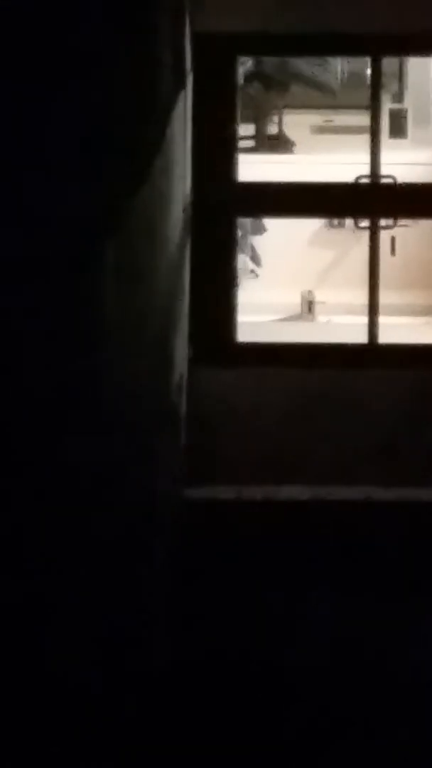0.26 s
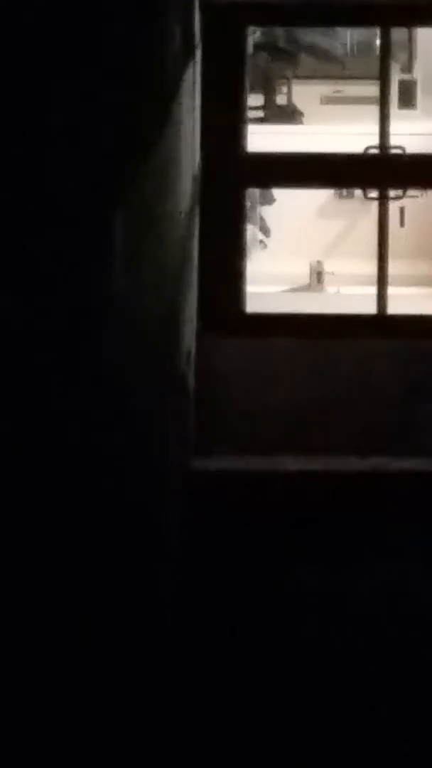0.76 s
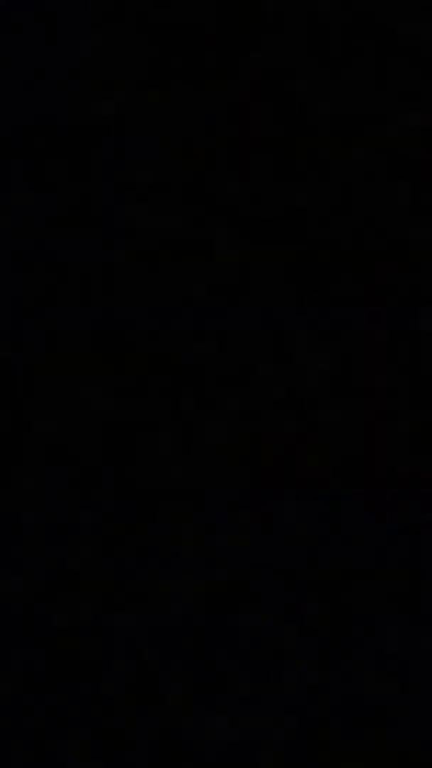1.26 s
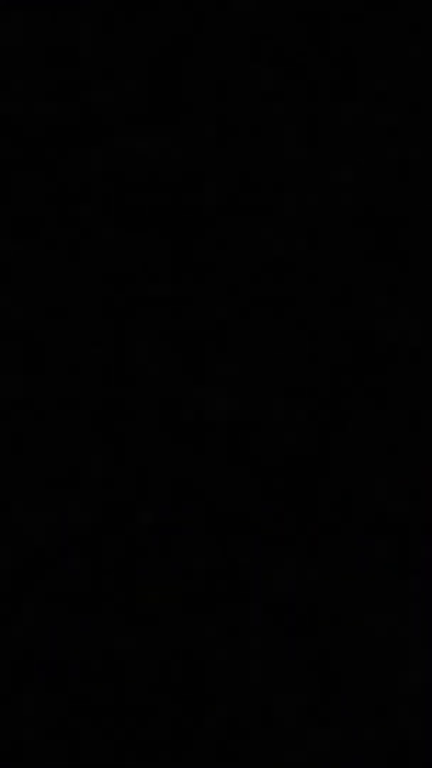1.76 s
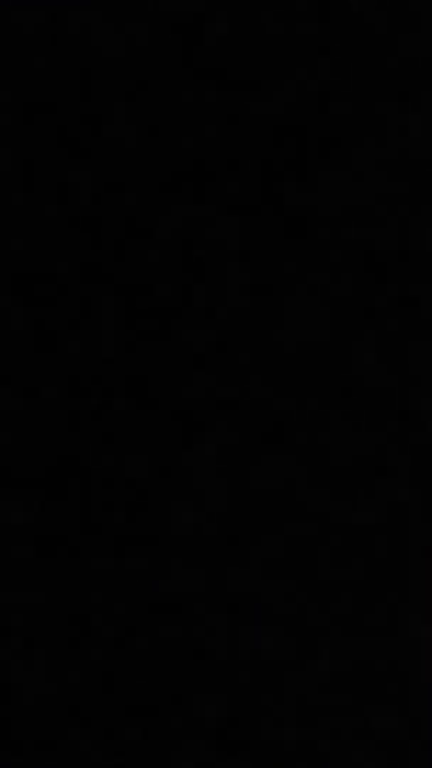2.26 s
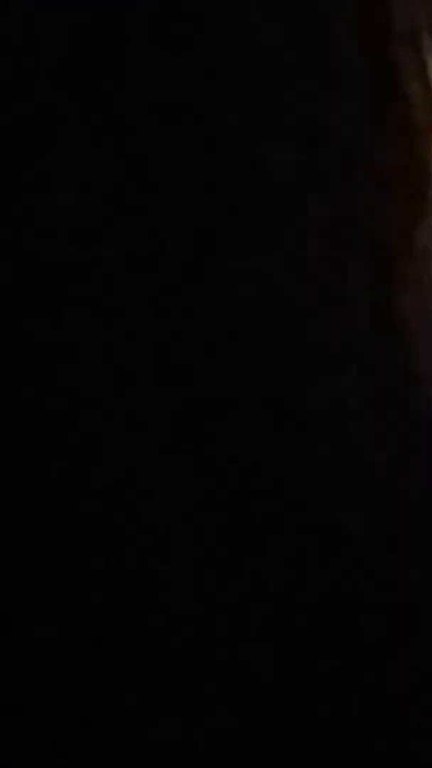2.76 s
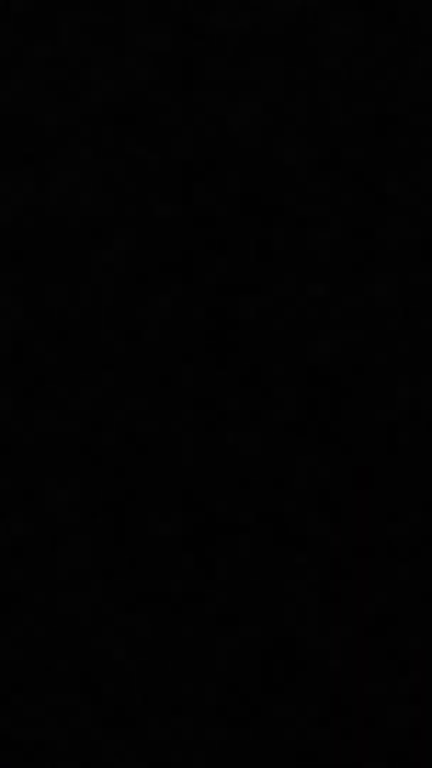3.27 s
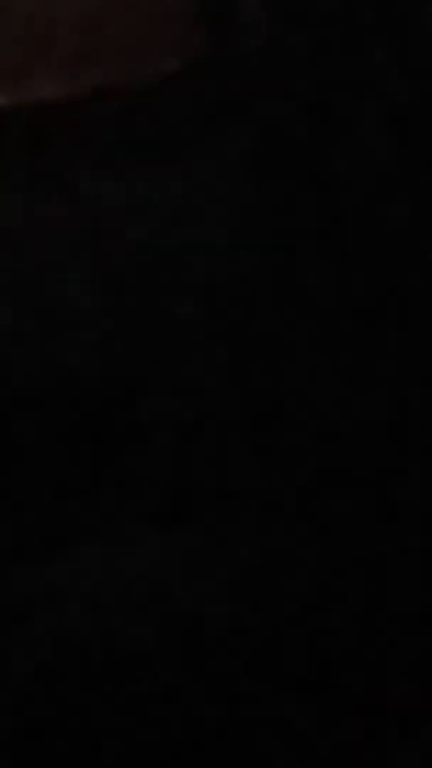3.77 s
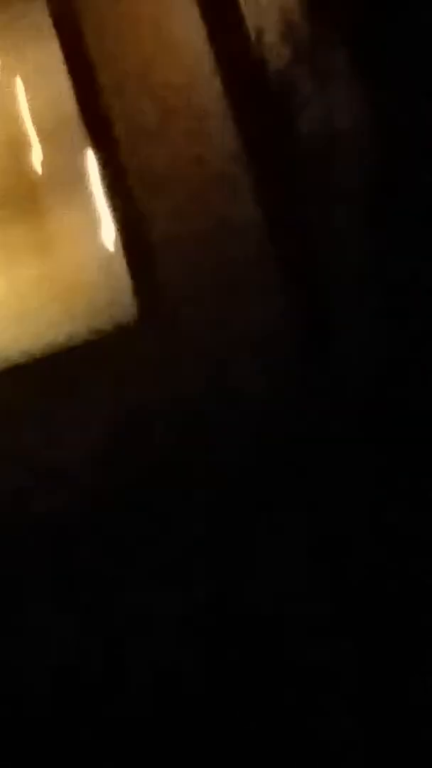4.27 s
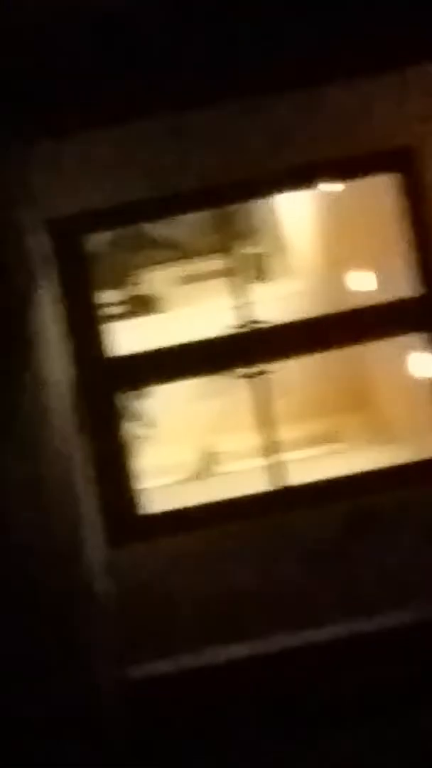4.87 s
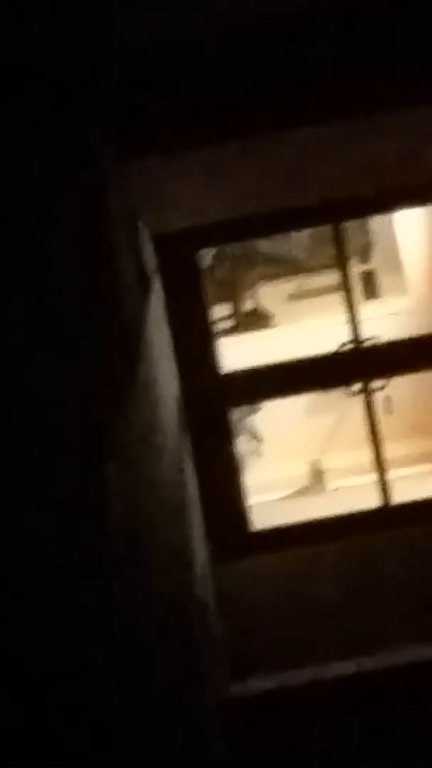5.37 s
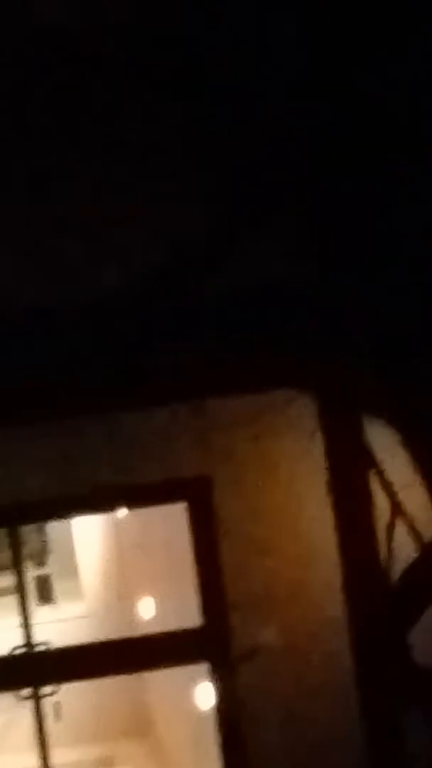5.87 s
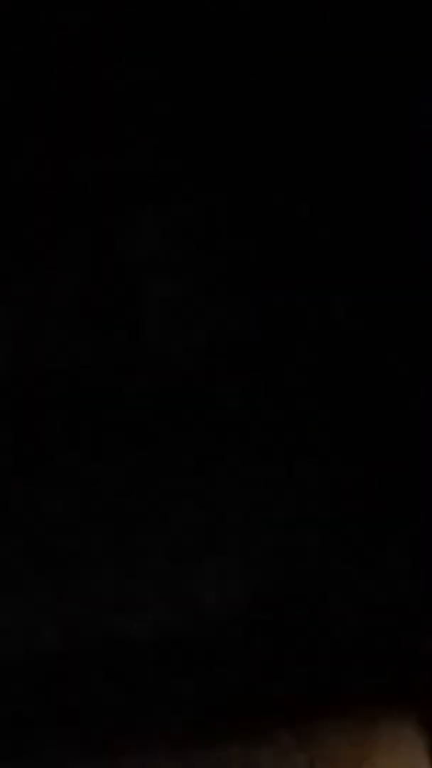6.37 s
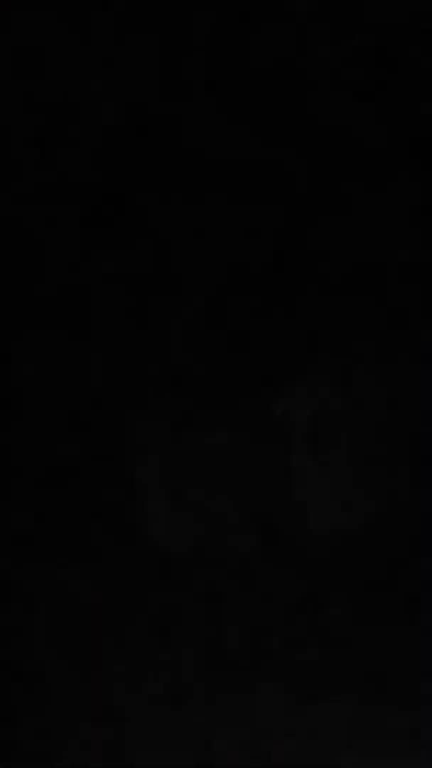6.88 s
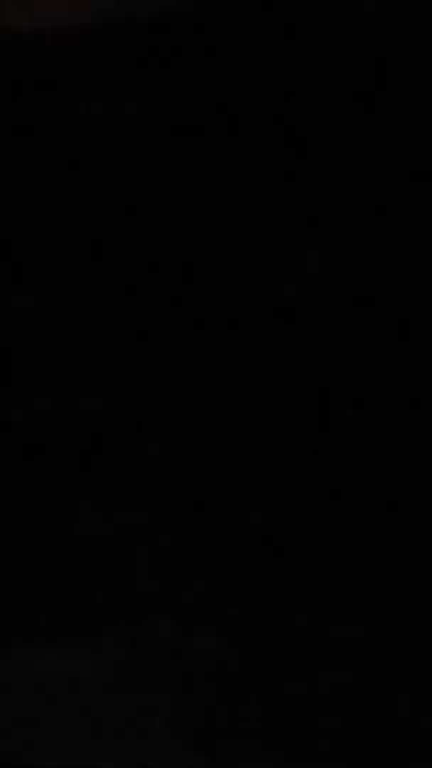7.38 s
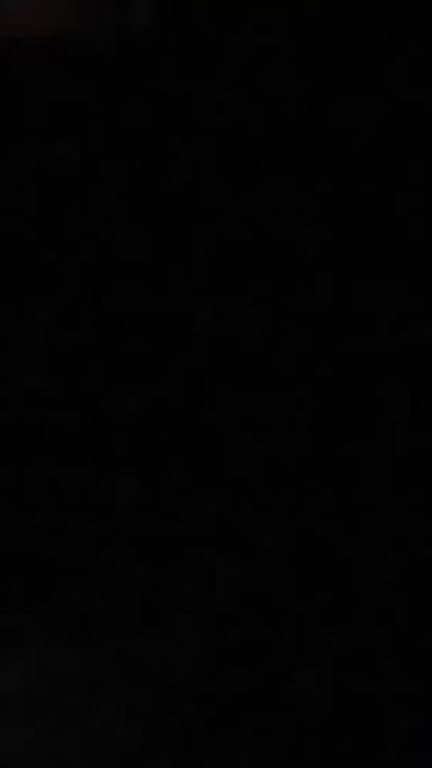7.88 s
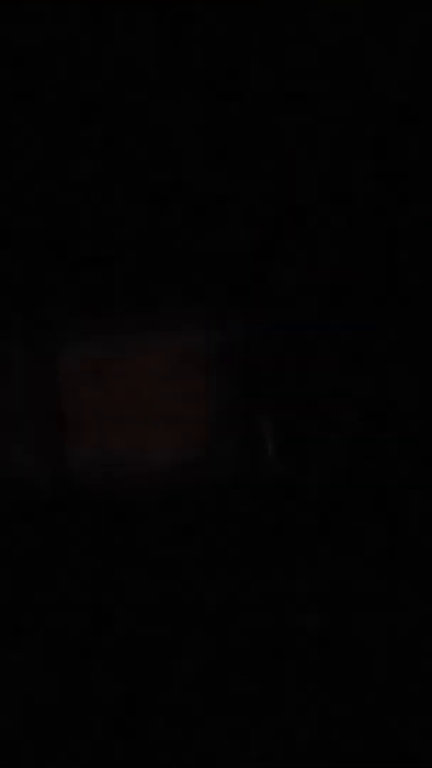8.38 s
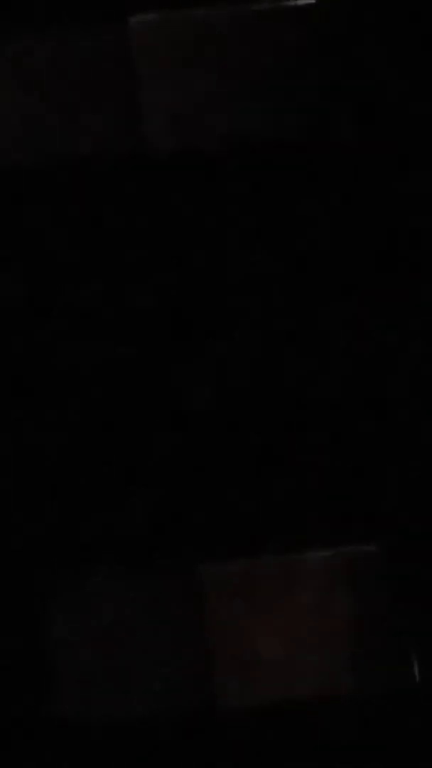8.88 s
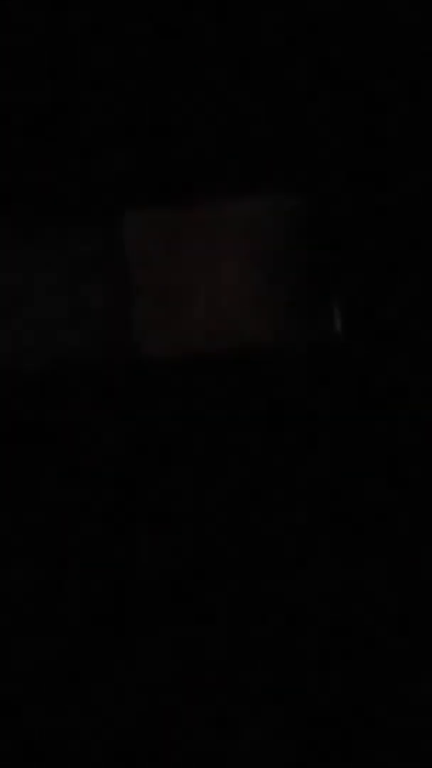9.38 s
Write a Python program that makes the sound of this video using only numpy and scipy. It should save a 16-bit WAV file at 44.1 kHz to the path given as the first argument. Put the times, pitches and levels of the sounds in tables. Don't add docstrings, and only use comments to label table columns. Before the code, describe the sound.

Deep droning machinery hum in a dark yard, with a soft thump near the start, light sleeve rustles, a few taps and distant traffic hiss.

```python
import sys
import numpy as np
from scipy import signal
from scipy.fft import rfft, irfft, next_fast_len
from scipy.io import wavfile
from scipy.ndimage import uniform_filter1d

SR = 44100
rng = np.random.default_rng(int(sys.argv[2]) if len(sys.argv) > 2 else 0)


def how_loud(loudness_db):
    steps = np.asarray(loudness_db, float) / 20
    return 10 ** steps


def wav_record(signal):
    frames = np.transpose(np.atleast_2d(signal))
    bounded = np.clip(frames, -1, 1)
    quanta = np.round(bounded * 32767).astype(np.int16)
    wavfile.write(sys.argv[1], SR, quanta)


N = 424241
TIME_S = np.arange(N) / SR
CHANGE_S = 1.26955
IDLE_HZ = 29.3


def curve(table):
    time_s, value = np.transpose(table)
    return np.interp(TIME_S, time_s, value)


def on_log(hz, table, column):
    rows = np.array(table)
    return np.interp(np.log(hz), np.log(rows[:, 0]), rows[:, column])


def walk(rate_hz):
    step = int(SR / rate_hz / 64)
    knots = rng.standard_normal(N // 64 // step + 3)
    joined = np.interp(np.arange(N // 64 + 2) / step, np.arange(len(knots)), knots)
    smooth = uniform_filter1d(joined, step)
    return 1.29 * np.interp(np.arange(N) / 64, np.arange(len(smooth)), smooth)


def bump(center_s, width_s):
    return np.exp(-((TIME_S - center_s) / width_s) ** 2)


def before_change():
    return 1. * (TIME_S < CHANGE_S)


def pan_gains(pan_db):
    return how_loud(np.array([[pan_db], [-pan_db]]) / 2)


# pitch_hz, left_minus_right_db, left_lead_rad
PORT_TONES = [(30, -3, .3), (59, -3, -0.64), (88.6, 5, 0.14), (118, -1, -0.13), (150, 8, -0.11),
              (178, 0.3, -0.21), (208, 2, -0.54), (230, 4, -0.41), (278, 5, 0.59), (408, -7.5, -0.34),
              (653, 12.5, -0.58)]


def tone(turns, hz, level_db, flutter_db, wander_rad):
    pan_db, lead_rad = on_log(hz, PORT_TONES, 1), on_log(hz, PORT_TONES, 2)
    restart = np.clip((TIME_S - CHANGE_S) * 200, 0, 1) * (rng.random() - .5)
    phase = 2 * np.pi * (turns + rng.random() + restart) + wander_rad * walk(5)
    size = np.sqrt(2) * how_loud(level_db + flutter_db * walk(6))
    left = how_loud(pan_db / 2) * np.cos(phase + lead_rad / 2)
    right = how_loud(-pan_db / 2) * np.cos(phase - lead_rad / 2)
    return size * np.array([left, right])


# time_s, firing_hz
ENGINE_SPEED = [(1.269, 29.93), (1.27, 28.72), (1.7, 28.87), (2.25, 29.41), (2.55, 29.05), (2.9, 29.21),
                (3.15, 29.6), (3.6, 29.8), (4.5, 29.84), (5.3, 29.53), (5.5, 29.07), (6.2, 28.99),
                (6.55, 29.15), (7, 28.7), (7.45, 29.05), (7.75, 28.79), (8.3, 29.23), (9.62, 29.07)]


def firing_rate():
    return curve(ENGINE_SPEED) + 0.0498 * walk(3)


# pitch_hz, width_hz, depth_db
YARD_NULLS = [
    (174.08, 1.01, 8),
    (233.6, 2.4, 8),
]


def null_db(hz):
    return sum(depth_db * np.exp(-((hz - null_hz) / width_hz) ** 2)
               for null_hz, width_hz, depth_db in YARD_NULLS)


# order, idle_db, slope_db_per_hz, loss_before_change_db
LOUD_ORDERS = [
    (3, -38.5, -4.5, 1.5),
    (6, -36, 0.2, 1.6),
    (7, -46, -12, -4),
    (8, -39.5, 5, 4.5),
    (4, -48.5, 4, 2),
    (9, -51.5, -3.5, 5),
]
STEADY_THIRDS = [3, 4, 5, 6, 7, 8, 10, 11, 13, 14, 15, 16, 17, 19, 20, 22, 23, 25, 26, 28, 30, 32, 33, 39,
                 40, 42, 45, 63]
STEADY_DB = [-55, -65, -64, -44.5, -68.5, -65, -59.5, -68, -59, -59, -57.5, -60, -59.5, -56.5, -56.5, -57.5,
             -56, -53.5, -65, -60, -65, -66.5, -61.5, -67, -69, -59, -67.5, -73]


def engine(hz):
    turns, mean_hz = np.cumsum(hz) / SR, np.mean(hz)
    out = np.zeros((2, N))
    for order, idle_db, slope_db, loss_db in LOUD_ORDERS:
        level_db = idle_db + slope_db * (hz - IDLE_HZ) - loss_db * before_change() - null_db(order * hz)
        out += tone(order * turns, order * mean_hz, level_db, flutter_db=.5, wander_rad=0.042)
    for thirds, level_db in zip(STEADY_THIRDS, STEADY_DB):
        order = thirds / 3
        out += tone(order * turns, order * mean_hz, level_db, flutter_db=1.5, wander_rad=0.28)
    return out


# harmonic, idle_db, slope_db_per_hz, loss_before_change_db
BLADE_TONES = [
    (1, -46.5, 1.5, 3),
    (2, -56, -4, -2.2),
    (3, -61.5, -4, 8),
]


def fan(hz):
    fan_ratio, slip = 7.13, 0.001665
    turns = fan_ratio * np.cumsum(hz * (1 + slip * walk(4))) / SR
    mean_hz = fan_ratio * np.mean(hz)
    out = np.zeros((2, N))
    for harmonic, idle_db, slope_db, loss_db in BLADE_TONES:
        level_db = idle_db + slope_db * (hz - IDLE_HZ) - loss_db * before_change()
        out += tone(harmonic * turns, harmonic * mean_hz, level_db, flutter_db=1.24, wander_rad=0.25)
    return out


def far_machine():
    pitch_hz, level_db, fade_db_per_s = 547.4, -64, 2.1
    return tone(pitch_hz * TIME_S, pitch_hz, level_db - fade_db_per_s * TIME_S,
                flutter_db=4.0, wander_rad=1.5)


# pitch_hz, left_db_per_hz, right_db_per_hz
RUMBLE = [(14, -85, -86), (22, -72, -73), (40, -70, -70), (72, -74, -74), (105, -72, -72), (150, -73, -73),
          (215, -68, -70), (255, -70, -72), (290, -72, -71), (350, -75, -77), (400, -76, -76),
          (470, -76, -79), (540, -77.5, -81)]
# pitch_hz, left_db_per_hz, right_db_per_hz
AIR = [(690, -78, -80), (920, -82, -78), (1160, -81, -80), (1527, -86.5, -84.5), (1876, -92.5, -90.5),
       (2500, -93, -99), (3630, -101, -102), (4280, -107, -105), (6300, -109, -107), (7200, -114, -109),
       (7900, -115, -114), (9000, -115, -114), (11300, -112, -111), (15600, -113, -112)]
# pitch_hz, likeness_0_to_1, left_lead_rad
LIKENESS = [(30, .95, 0), (250, .92, -.2), (400, .72, -.7), (520, .62, -.2), (640, .45, -.9),
            (760, .1, -2.2), (900, .55, -2.6), (1100, .5, -2.1), (1380, .8, -3.1), (1600, .4, -3.5),
            (2300, .25, -4.5), (3300, .25, -3.1), (6000, .08, -3.1), (15000, .05, -3.1)]
# delay_s, gain
WALL_ECHOES = [
    (.0019, .17),
    (.0033, .15),
    (.0058, .12),
]


def port_noise(hz, size):
    shared, *own = (rfft(rng.standard_normal(size)) * np.sqrt(SR / 2) for _ in range(3))
    like = np.clip(on_log(hz, LIKENESS, 1), 0, 1)
    lead = np.exp(.5j * on_log(hz, LIKENESS, 2))
    echo_band = (hz > 600) * (hz < 8000)
    ports = []
    for port, (turn, stretch) in enumerate([(lead, 1), (1 / lead, 1.13)]):
        noise = np.sqrt(like) * shared * turn + np.sqrt(1 - like) * own[port]
        echoes = sum(gain * np.exp(-2j * np.pi * hz * delay_s * stretch) for delay_s, gain in WALL_ECHOES)
        ports.append(how_loud(on_log(hz, RUMBLE + AIR, port + 1)) * noise * (1 + echo_band * echoes))
    return np.array(ports)


# time_s, level_db
TRAFFIC = [
    (0, -3),
    (1.269, -1.5),
    (1.27, -5.5),
    (3.2, -2),
    (4.8, -0.5),
    (7.3, -0.2),
    (8.2, -1),
    (8.7, 1.5),
    (9.62, 5.5),
]


def air(engine_hz):
    size = next_fast_len(N)
    hz = np.maximum(np.arange(size // 2 + 1) * SR / size, 1)
    ports = port_noise(hz, size)
    drone_db = curve(TRAFFIC)
    brush_db = 5.5 * bump(2.73, .8)
    car_db = 4.5 * bump(8.64, 0.62)
    tyre_db = -1.4 + 0.32 * drone_db + 1.5 * before_change() + car_db + 0.65 * brush_db
    load_db = -3.5 * (engine_hz - np.mean(engine_hz))
    middle_db = (drone_db + tyre_db) / 2 + 0.83 + 1.5 * before_change()
    swell_db = [0, 0, 0, load_db, load_db / 2 + 0.33 * drone_db, drone_db,
                middle_db, tyre_db, brush_db, 0.44 * brush_db]
    centers_hz = [40, 90, 180, 350, 600, 1100, 1800, 3000, 6500, 11000]
    place = np.interp(np.log(hz), np.log(centers_hz), np.arange(10))
    out = np.zeros((2, N))
    for k, level_db in enumerate(swell_db):
        band = irfft(ports * np.clip(1 - abs(place - k), 0, 1), size)[:, :N]
        out += band * how_loud(level_db + 0.52 * walk(3.1))
    return out


def crickets():
    pitch_hz, width_hz, level_db, fade_db, fade_s = 7060, 340, -79.5, -9, 1.6
    edges_hz = [pitch_hz - width_hz / 2, pitch_hz + width_hz / 2]
    sos = signal.butter(2, edges_hz, "bandpass", fs=SR, output="sos")
    band = signal.sosfilt(sos, rng.standard_normal((2, N)))
    faded = 1 - np.exp(-np.maximum(TIME_S - CHANGE_S, 0) / fade_s)
    return band / band.std() * how_loud(level_db + fade_db * faded + 1.5 * walk(9))


def handling(table, length_s, trim_db, rise):
    out = np.zeros((2, N))
    ranges_hz = [1200, 4000], [3500, 9000], [8000, 17000]
    filters = [signal.butter(2, edges, "bandpass", fs=SR, output="sos") for edges in ranges_hz]
    time = np.arange(int(SR / 4)) / SR / length_s
    shape = (1 - np.exp(-time / rise)) * np.exp(-time ** 2 * 2)
    for start_s, level_db, low_db, pan_db in table:
        high_db = -16.5 - 0.43 * pan_db
        uneven = np.repeat(rng.standard_normal((2, len(time) // 30 + 1)), 30, axis=1)[:, :len(time)]
        grains = shape * rng.standard_normal((2, len(time))) * how_loud(3.5 * uneven)
        gains_db = low_db + 5.5, 0, high_db + 8.5
        burst = sum(how_loud(db) * signal.sosfilt(sos, grains) for db, sos in zip(gains_db, filters))
        start = int(start_s * SR)
        out[:, start:start + len(time)] += burst * how_loud(level_db + trim_db) * pan_gains(pan_db)
    return out


# start_s, peak_db, low_part_db, left_minus_right_db
TICKS = [(0.429, -55, -8, -6.5), (0.4336, -44, -2.5, -17), (1.3798, -49, -12, 1.5), (1.488, -55, 8, -7),
         (1.6644, -62, 0.1, -2.1), (1.765, -61, -6, -3.5), (1.923, -53, -7, -4), (2.658, -44, -15, -14),
         (2.814, -41, -6, 0.6), (3.5097, -53, 0.1, -5), (3.632, -58, -1.1, -3.5)]


def ticks():
    return handling(TICKS, length_s=0.0058, trim_db=-5.5, rise=0.057)


# start_s, peak_db, low_part_db, left_minus_right_db
RUSTLES = [(0.4334, -57, -1, -8), (1.3796, -61, -14, 1.5), (1.6194, -60, 4, -3), (1.936, -57, -9, -6),
           (2.1093, -54, -4, -10), (2.2595, -58, 3, -6), (2.345, -48.5, 2.5, -3), (2.3844, -51.5, -12, -11),
           (2.43, -55, -1, -10), (2.5294, -49, 0.6, -2.1), (2.559, -45, -4, 0.6), (2.5789, -46, -9, 0.1),
           (2.599, -48, -11, -2.1), (2.6194, -43, -8, -4), (2.638, -45, -20, -13), (2.6794, -48, -7, -6),
           (2.7194, -50, -7, -2.1), (2.7997, -59, -13, 1.5), (2.9344, -51, -9, -2.5),
           (2.9898, -54, -11, -7), (3.1292, -54, -13, -5), (3.5111, -51.5, 1, -12), (3.528, -54.5, 5, -3),
           (3.5994, -52.5, 0.1, -8)]


def rustles():
    return handling(RUSTLES, length_s=0.052, trim_db=-2, rise=0.17)


# start_s, peak_db, ring_hz, width_hz, left_minus_right_db
TAPS = [(.4335, -52, 9300, 700, -11), (.436, -52, 3700, 300, -5), (1.804, -53, 8000, 3000, -5),
        (2.203, -54, 9000, 9000, -4), (2.659, -51, 12300, 900, -9), (2.7126, -43, 2800, 5000, 2),
        (2.926, -52, 9000, 12000, -2), (3.0463, -52, 7000, 5000, -2), (3.536, -51, 2500, 500, -4),
        (3.543, -50, 2100, 350, -4), (3.549, -50, 1800, 400, -4), (4.633, -43, 700, 700, 1.5),
        (4.6334, -53, 4400, 1500, -4), (4.634, -45, 1805, 700, -4), (4.641, -52, 1900, 900, -4)]


def taps():
    out, time_s = np.zeros((2, N)), np.arange(SR // 50) / SR
    for start_s, level_db, ring_hz, width_hz, pan_db in TAPS:
        ring = time_s * np.exp(-np.pi * width_hz * time_s) * np.sin(2 * np.pi * ring_hz * time_s)
        push = rng.standard_normal(40) * np.exp(-np.arange(40) / 12)
        tap = np.convolve(ring, push)[:len(time_s)]
        start = int(start_s * SR)
        out[:, start:start + len(time_s)] += tap / abs(tap).max() * how_loud(level_db) * pan_gains(pan_db)
    return out


def scene():
    hz = firing_rate()
    yard = engine(hz) + fan(hz) + far_machine() + air(hz) + crickets()
    hand = ticks() + rustles() + taps()
    return yard + hand


def low_pass(x):
    return signal.sosfilt(signal.butter(12, 16700, fs=SR, output="sos"), x)


def record(dry):
    time_s = TIME_S - CHANGE_S
    step = -0.047 * np.clip(time_s * SR, -.5, .5) * np.exp(-np.abs(time_s) / 0.0025)
    top = signal.ellip(12, .2, 90, 15720, fs=SR, output="sos")
    mix = signal.sosfilt(top, dry + step) - .0006
    return low_pass(mix)


dry = scene()
out = record(dry)
wav_record(out)
```